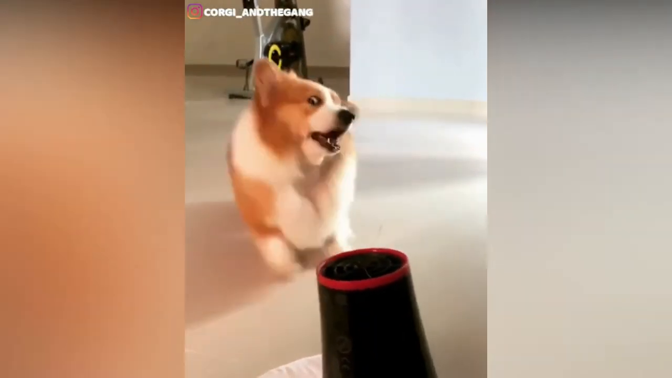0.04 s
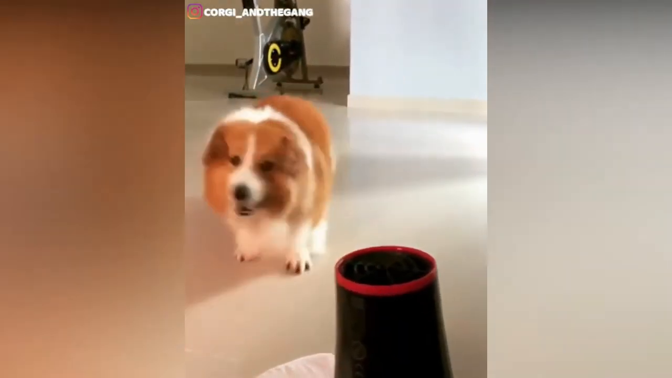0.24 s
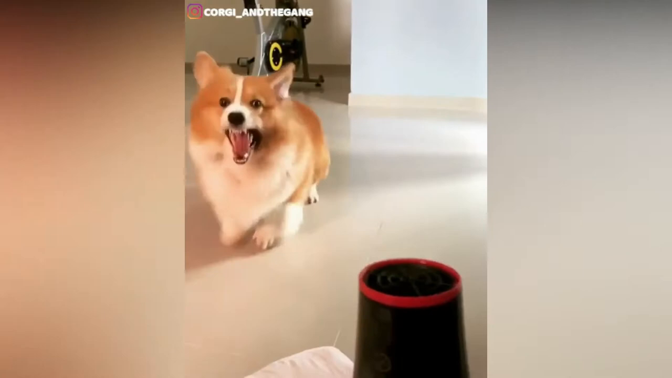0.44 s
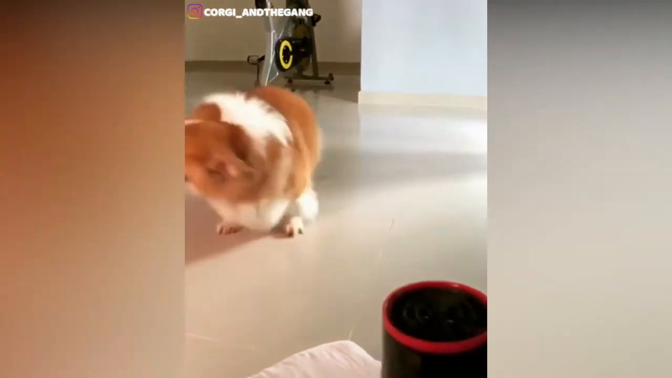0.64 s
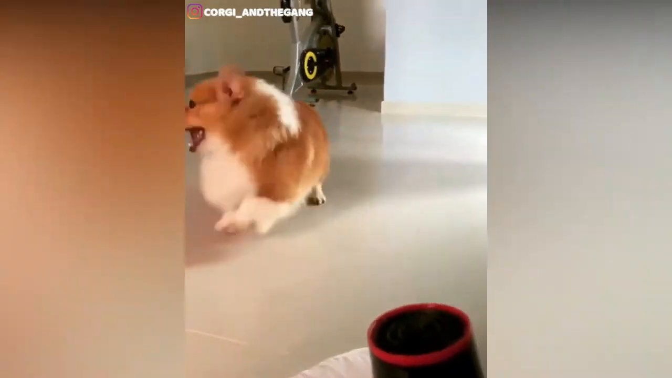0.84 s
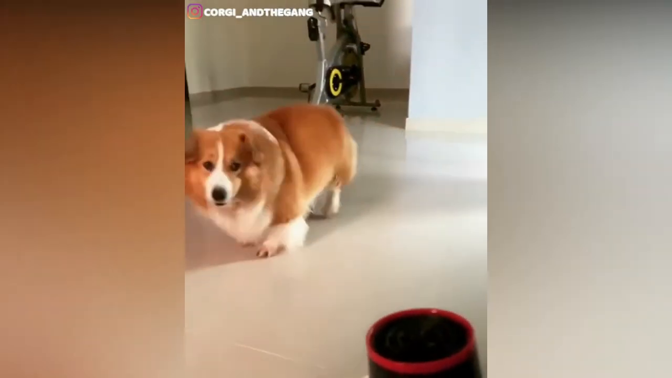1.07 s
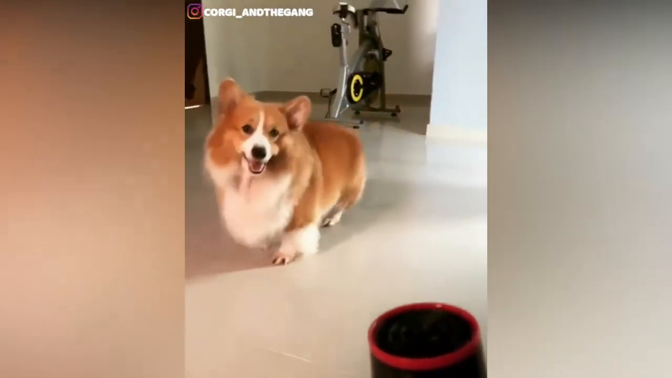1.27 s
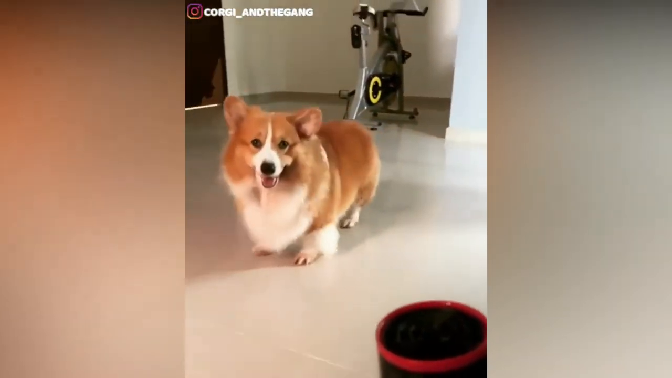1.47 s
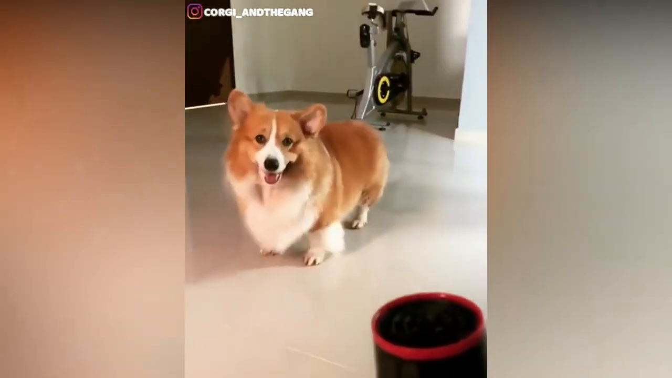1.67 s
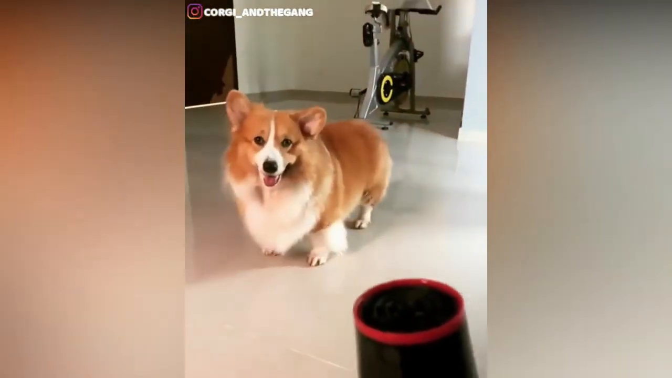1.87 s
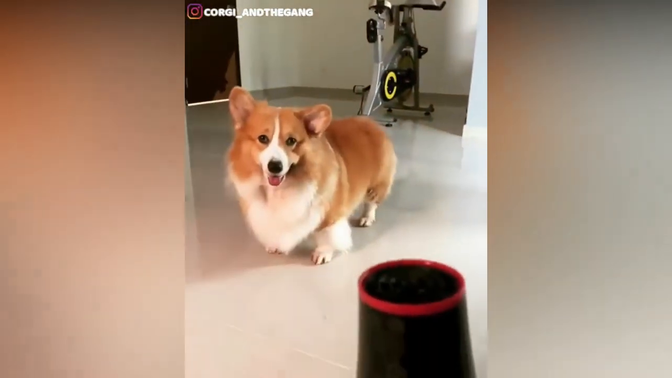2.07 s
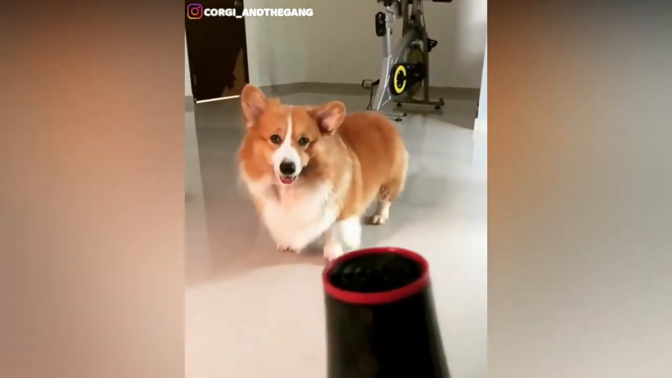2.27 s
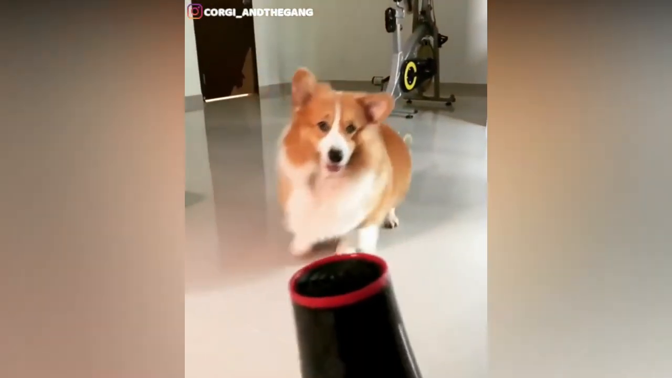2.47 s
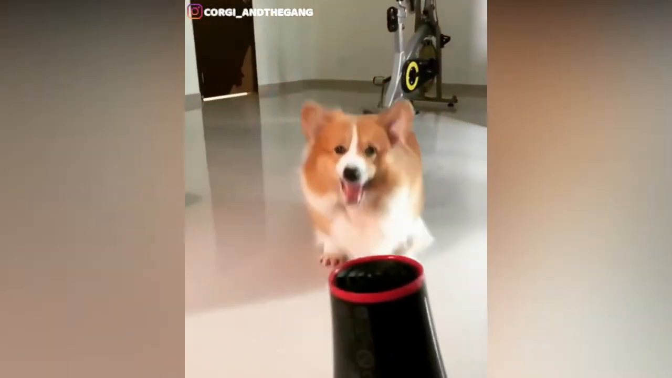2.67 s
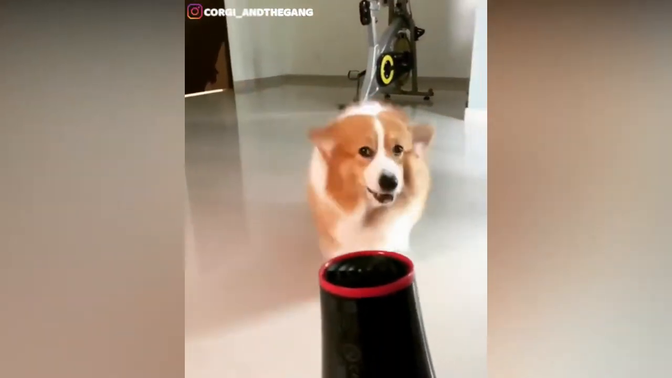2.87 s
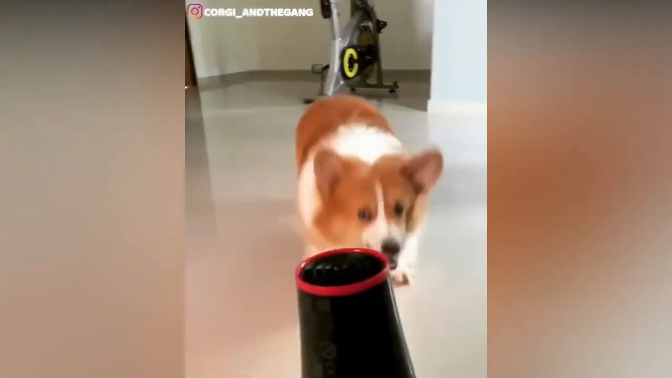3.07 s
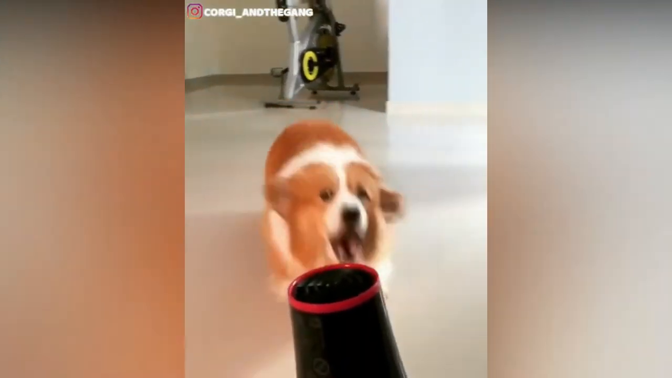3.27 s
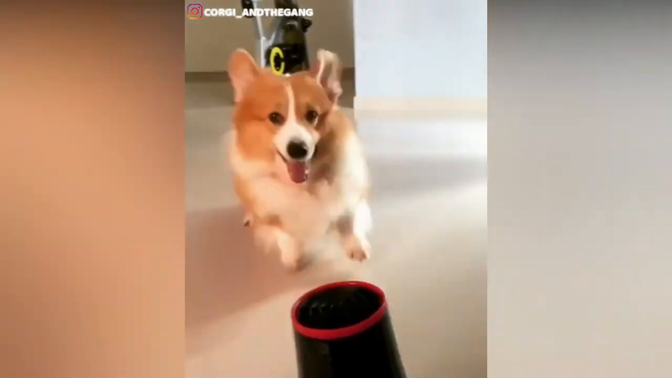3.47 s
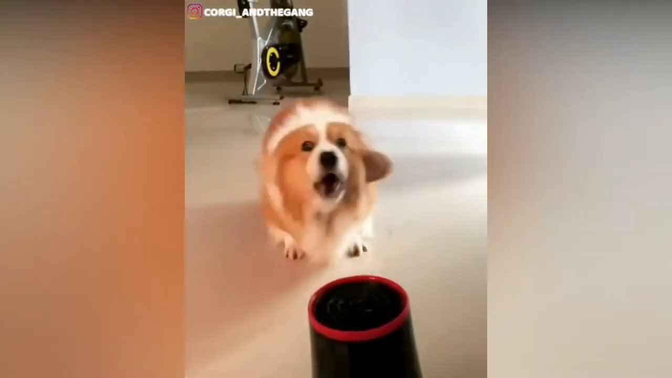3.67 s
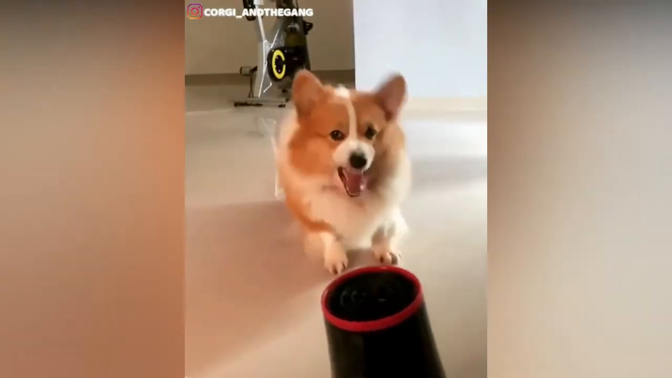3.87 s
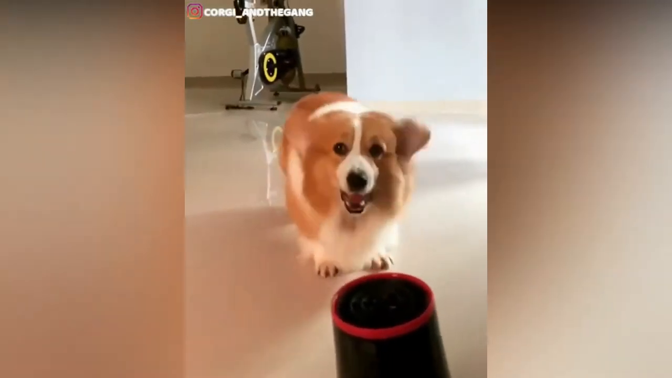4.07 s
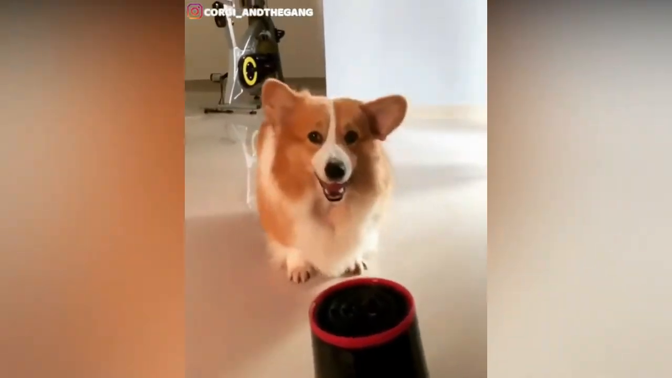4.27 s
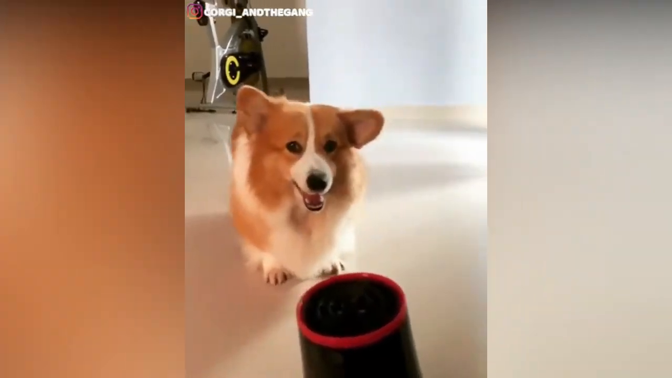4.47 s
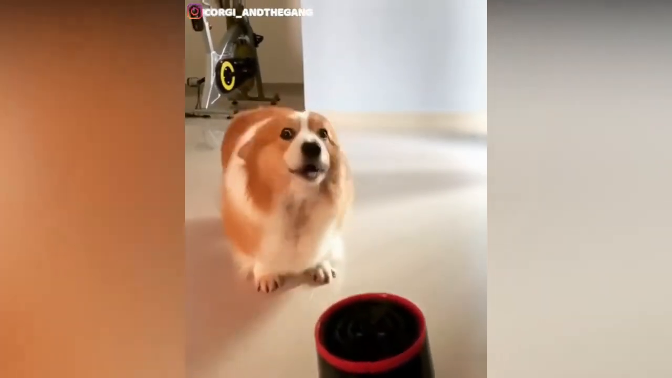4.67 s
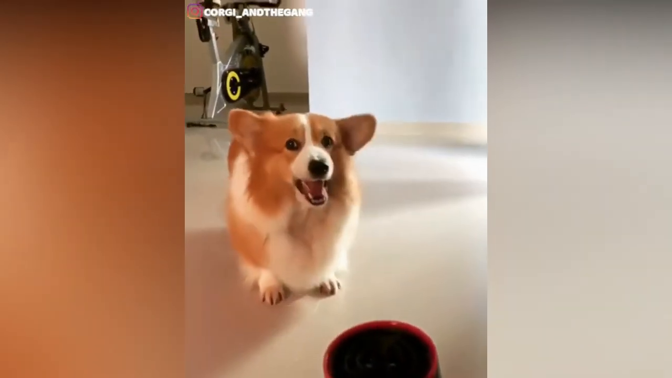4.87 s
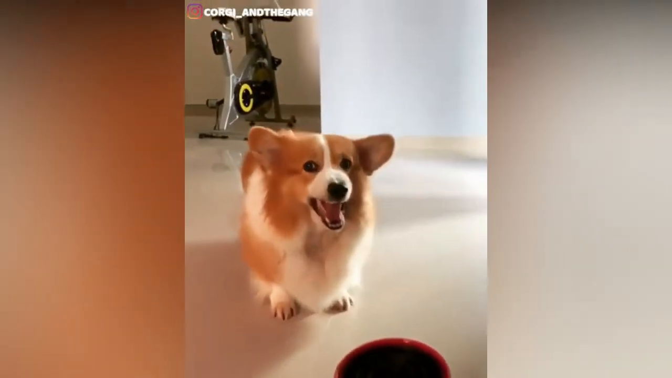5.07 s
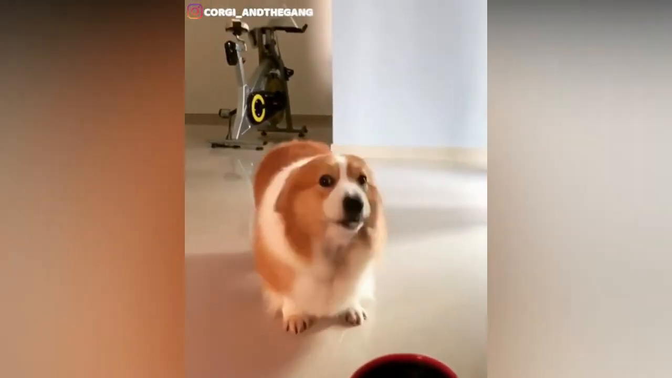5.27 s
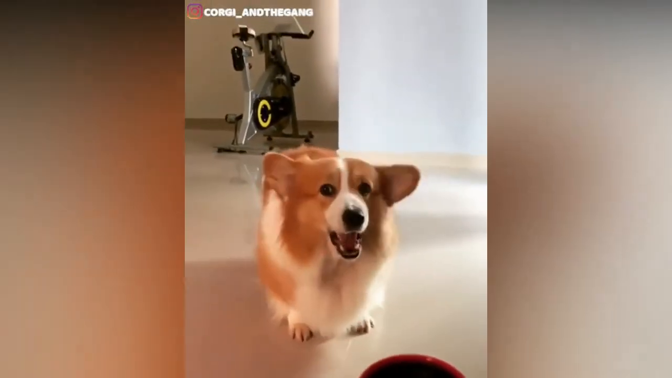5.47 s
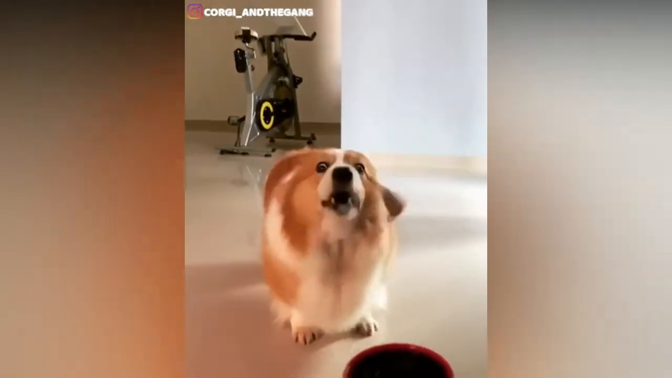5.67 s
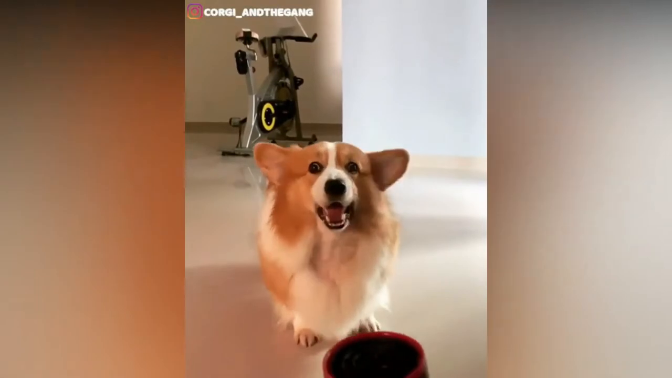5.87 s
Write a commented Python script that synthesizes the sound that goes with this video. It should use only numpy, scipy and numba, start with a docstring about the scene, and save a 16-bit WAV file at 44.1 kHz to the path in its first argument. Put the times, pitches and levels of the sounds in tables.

```python
"""Small dog barking at a hair dryer

A small dog barks ten times in a bare, tiled room, its claws ticking and paws bumping between barks.
Each bark opens low and hoarse, most break upward into a yelp, and all fall away while the room rings on.
A hair dryer clicks on close by, spins up and blows: shaped noise plus two faint tones from the fan.
The voice is a sum of wavering harmonics plus noisy air; a phone's limiter turns down the loudest peaks."""
import sys
import numpy as np
from scipy import signal
from scipy.fft import rfft, irfft, next_fast_len
from scipy.io import wavfile
from scipy.ndimage import uniform_filter1d, minimum_filter1d
from numba import njit

SR = 44100
rng = np.random.default_rng(int(sys.argv[2]) if len(sys.argv) > 2 else 0)


def waveform_to_disk(signal):
    """Save audio, clipped to [-1, 1], as 16-bit WAV at the path in sys.argv[1]."""
    frames = np.transpose(np.atleast_2d(signal))
    scaled = np.clip(frames, -1, 1) * 32767
    samples = np.round(scaled).astype(np.int16)
    wavfile.write(sys.argv[1], SR, samples)


N = 261954
T = np.arange(N) / SR


def undb(db):
    """Turn decibels into a plain multiplier."""
    return 10 ** (np.asarray(db) / 20)


def unit(x):
    """Scale a sound to an average (RMS) strength of 1."""
    return x / np.sqrt(np.mean(x ** 2) + 1e-20)


def steady(x):
    """Hold the short-term power at 1, so that effort alone sets the loudness."""
    return x / np.sqrt(uniform_filter1d(x ** 2, size=500) + 1e-12)


def blend(a, b, share):
    """Go from a to b as share goes from 0 to 1."""
    return a + (b - a) * share


def curves(rows, t):
    """Join the columns of a table by straight lines in time."""
    s, *columns = np.transpose(rows)
    return [np.interp(t, s, c) for c in columns]


def at_hz(points, hz):
    """Read (f/Hz, value) points on a log-frequency axis."""
    f, value = np.transpose(points)
    return np.interp(np.log(hz + 1), np.log(f), value)


def bins(n):
    """The frequencies, in Hz, that make up a sound of n samples."""
    return np.arange(n // 2 + 1) * SR / n


def colour(x, points):
    """Filter by a (f/Hz, level/dB) spectrum."""
    n = x.shape[-1]
    return irfft(rfft(x) * undb(at_hz(points, bins(n))), n)


def walk(n, rate):
    """Smooth chance with spread 1 that changes about rate times a second."""
    knots = np.arange(n) * rate / SR
    return unit(np.interp(knots, np.arange(n), rng.standard_normal(n)))


def pair(n, bass_width=0.063, treble_width=0.22):
    """Diffuse noise at two close microphones: alike in the bass, apart in the treble."""
    mid, side = rng.standard_normal((2, n))
    width = at_hz([(110, bass_width / 4), (450, bass_width), (4000, treble_width)], bins(n))
    side = irfft(rfft(side) * width, n)
    return np.array([mid + side, mid - side])


# tones at which the room rings along with the voice: (f/Hz, width/Hz, level/dB)
ROOM_MODES = [(800, 56, 7), (1318, 360, 5.5)]
# how long echoes take to fade by 60 dB: (f/Hz, t/s)
ROOM_DECAY = [(150, 0.66), (600, 0.72), (1300, 0.76), (2500, 0.86), (6000, 0.98), (11000, 0.58)]


def room(x, rings, build_s=0.00063, gap_s=0.0029):
    """Echoes off tiles and bare walls arrive in clumps, fade at a pace set by pitch, and ring at a few modes."""
    clump_db = 2.5
    t = T[:SR]
    hz = bins(SR)
    modes = 1 + sum((undb(db) - 1) / (1 + (2 * (hz - f) / w) ** 2) for f, w, db in rings)
    clumps = undb(clump_db * walk(SR, 220.93))
    echoes = rfft(pair(SR, bass_width=0.59, treble_width=0.22) * clumps) * modes
    centres = [f for f, _ in ROOM_DECAY]
    response = 0
    # each band peaks at its own centre and dies at its own pace
    for share, (_, t60) in zip(np.eye(len(centres)), ROOM_DECAY):
        band = irfft(echoes * at_hz(list(zip(centres, share)), hz), SR)
        response = response + band * np.exp(-np.log(1000) * t / t60)
    response = response * (1 - np.exp(-np.maximum(t - gap_s, 0) / build_s))
    response = response / np.sqrt(np.sum(response ** 2) / 2)
    return signal.fftconvolve(x[None], response, axes=1)[:, :N]


# tone balance of the quiet room, before its level is set: (f/Hz, level/dB)
MURMUR = [(18, -29), (30, -7.5), (77, -2.5), (98, -6), (149, -7.5), (206, -3.5), (3280, -30), (4630, -35),
          (9250, -45.5), (11000, -47), (14300, -86), (22000, -120)]
MURMUR_DB = -51


def murmur(early_db=9):
    """Low murmur of the room: filtered noise, stronger at first."""
    swell_db = np.interp(T, [.1, 1.6], [early_db, 0]) + walk(N, 5.1)
    return unit(colour(pair(N), MURMUR)) * undb(MURMUR_DB + swell_db)


def knocks(rows, body, rise_s, decay_s, width):
    """Short contacts, each a burst that swells to its peak and dies in a well-damped body."""
    shape = sum(undb(db) * np.exp(-np.maximum((s - T) / rise_s, (T - s) / decay_s)) for s, db in rows)
    return shape * unit(colour(pair(N, treble_width=width), body))


# the two steps of the dryer's switch: (t/s, level/dB)
SWITCH = [(2.3565, -15.5), (2.4002, -11.5)]
# tone balance of its plastic: (f/Hz, level/dB)
SWITCH_BODY = [(200, -13.5), (900, -6), (1600, -5.5), (2400, -4.5), (3400, -1), (4800, -1), (7000, 0),
               (10000, -2.5), (12000, -6)]


def switch(slide_db=-24):
    """The plastic switch snaps in short bursts over a fainter, longer slide."""
    snap = knocks(SWITCH, SWITCH_BODY, rise_s=0.00075, decay_s=0.0023, width=0.75)
    slide = knocks(SWITCH, SWITCH_BODY, rise_s=0.0033, decay_s=0.011, width=0.47)
    return snap + undb(slide_db) * slide


# claws on the tiles: (t/s, level/dB)
CLAWS = [(1.57, -49), (2.017, -51), (2.128, -53), (2.222, -44), (2.296, -51)]
# tone balance of a claw tick: (f/Hz, level/dB)
CLAW_BODY = [(300, -10), (1800, 4), (5000, -11), (8000, -6), (11000, -11.5)]


def claws():
    """Hard claws tick on the tiles in short, bright bursts of noise."""
    return knocks(CLAWS, CLAW_BODY, rise_s=0.0012, decay_s=0.0037, width=0.99)


# dull bumps as the dog hops and lands: (t/s, level/dB)
BUMPS = [(.15, -23), (.22, -42), (.5, -41.5), (.59, -34.5), (.635, -46), (.95, -38.5), (1.05, -37.5),
         (3.17, -36.5), (3.24, -45), (3.285, -65), (3.63, -43)]
# tone balance of a bump: (f/Hz, level/dB)
BUMP_BODY = [(30, -17), (70, -9), (130, -4.5), (280, -8), (500, -21), (2000, -59), (8000, -99)]


def bumps():
    """Soft paws land in slow, low bursts of noise."""
    return knocks(BUMPS, BUMP_BODY, rise_s=0.022, decay_s=0.15, width=0.24)


def small_sounds(click_room_db=-9, bump_room_db=-8):
    """Switch, claws and paws, straight to the microphones and by way of the room."""
    clicks = switch() + claws()
    thumps = bumps()
    sent = undb(click_room_db) * clicks + undb(bump_room_db) * thumps
    return clicks + thumps + room(sent.mean(axis=0), ROOM_MODES, build_s=0.0067)


LANDING_S, LANDING_HZ, LANDING_DB = 3.26, 71.5, -25


def landing(rise_s=0.023, decay_s=0.03):
    """One heavy landing close to the phone makes a low thud: a sine that swells and dies."""
    age = T - LANDING_S
    envelope = np.exp(-np.maximum(-age / rise_s, age / decay_s))
    return undb(LANDING_DB) * np.sin(2 * np.pi * LANDING_HZ * age) * envelope


# tone balance of the air rushing through the barrel: (f/Hz, level/dB)
RUSH = [(50, 1.5), (120, 8), (250, 4), (380, 10), (480, 11), (700, 16), (1100, 6.5), (1550, 14), (1850, 6),
        (2600, 8), (3100, -13.5), (4500, -82), (7000, -70)]
# tone balance of the hiss at the nozzle: (f/Hz, level/dB)
HISS = [(1000, -41), (2800, 6.5), (4000, 7.5), (4900, 2), (6000, 8.5), (7300, 4.5), (9000, 3.5),
        (10300, 0.5), (12000, 3)]
RUSH_DB, HISS_DB = -32.5, -37.5
# the hand lowers the dryer away from the microphone: (t/s, level/dB)
DRYER_AIM = [(3.15, 2), (3.7, 1), (4.4, -4.5), (5.2, -5.5)]
HISS_AIM_SHARE = 0.44  # the hiss follows only this share of the aim
# the motor nears full speed exponentially, and its noise grows as a power of the speed
DRYER_ON_S, SPIN_UP_S, BLADE_HZ, SPEED_POWER = 2.46, .15, 1035, 1.68
# a fainter whine rises with the blade tone, above it
WHINE_RATIO, WHINE_DB = 1.7, -8.5
BUFFET_DB = 3.5  # turbulent air makes both tones flutter


def dryer():
    """The fan spins up: air rushes through the barrel, hisses at the nozzle, and the blades add a faint tone."""
    blade_db, flutter_db, waver = -10.5, .5, .002
    age = np.maximum(T - DRYER_ON_S, 0)
    speed = 1 - np.exp(-age / SPIN_UP_S)
    blow = speed ** SPEED_POWER
    aim_db, = curves(DRYER_AIM, T)
    rush = unit(colour(pair(N, bass_width=0.038, treble_width=0.04), RUSH))
    hiss = unit(colour(pair(N, bass_width=.3, treble_width=0.15), HISS))
    turn = 2 * np.pi * np.cumsum(BLADE_HZ * speed * (1 + waver * walk(N, 3.0))) / SR
    buffet = undb(BUFFET_DB * walk(N, 60))
    blades = unit(buffet * (np.sin(turn) + undb(WHINE_DB) * np.sin(WHINE_RATIO * turn)))
    barrel = blow * undb(RUSH_DB + aim_db)
    flow = (rush + undb(blade_db) * blades) * barrel * undb(flutter_db * walk(N, 45))
    nozzle = blow * undb(HISS_DB + HISS_AIM_SHARE * aim_db)
    return flow + hiss * nozzle * undb(.5 * walk(N, 38))


# every bark opens low, hoarse and quiet
OPEN_HZ, OPEN_ROUGH, ATTACK_DB = 238.2, 0.92, 26
# late in the held note the voice slides, frays and weakens, then it breaks into the yelp
SLIDE_S, FRAY, FRAY_S, SAG_DB, BREAK_S = .025, 0.39, 0.019, 4.5, .0039
# the yelp arches: it starts this share below its top and scoops up
SCOOP_SHARE, SCOOP_S = 0.065, 0.0057
# it is clearer, loudest a moment into its fall, and dies away low and a little rough
YELP_ROUGH_SHARE, FALL_S, END_HZ, END_ROUGH = 0.12, .035, 265.5, 0.44
SWELL_DB, SWELL_S, RELEASE_S, RELEASE_DB = 5, 0.022, 0.062, 28.5


def gesture(age, attack_s, settle_s, break_s, hold_s, held_hz, late_hz, yelp_hz, held_db, yelp_db, rough):
    """Pitch, effort and roughness through one bark: hoarse start, held note, break, falling yelp."""
    fall_at = break_s + hold_s
    loudest = fall_at + SWELL_S
    settled = np.clip(age / settle_s, 0, 1) ** 2
    to_break = np.maximum(break_s - age, 0)
    fraying = np.exp(-to_break / FRAY_S)
    broken = np.clip((age - break_s) / BREAK_S + .5, 0, 1)
    fallen = 1 - np.exp(-(np.maximum(age - fall_at, 0) / FALL_S) ** 2)
    slid = 1 - np.exp(-(np.maximum(age - settle_s, 0) / SLIDE_S) ** 2)

    note_hz = blend(OPEN_HZ, blend(held_hz, late_hz, slid), settled)
    scoop = 1 - SCOOP_SHARE * np.exp(-np.maximum(age - break_s, 0) / SCOOP_S)
    cry_hz = blend(yelp_hz * scoop, END_HZ, fallen)

    note_rough = blend(OPEN_ROUGH, rough, settled) + FRAY * fraying
    cry_rough = blend(YELP_ROUGH_SHARE * rough, END_ROUGH, fallen ** 1.5)

    quiet_start = np.clip(1 - age / attack_s, 0, 1) ** 1.07
    note_db = held_db - ATTACK_DB * quiet_start - SAG_DB * fraying
    cry_levels = [yelp_db - SWELL_DB, yelp_db, yelp_db - RELEASE_DB]
    cry_db = np.interp(age, [break_s, loudest, loudest + RELEASE_S], cry_levels)
    return (blend(note_hz, cry_hz, broken), blend(note_db, cry_db, broken),
            blend(note_rough, cry_rough, broken))


SECOND_LEAD_S, SECOND_WIDTH_S, SECOND_RISE_HZ_PER_S = .012, .016, 3500


def second_voice(t, peak_s, hz, db, waver=0.018):
    """As the held note frays, the folds also swing in a second mode that rises into the yelp."""
    lead = peak_s - t
    rising_hz = hz - SECOND_RISE_HZ_PER_S * (lead + SECOND_LEAD_S)
    pitch = rising_hz * (1 + waver * walk(SR, 249)[:len(t)])
    tone = np.sqrt(2) * np.sin(2 * np.pi * np.cumsum(pitch) / SR)
    return undb(db) * tone * np.exp(-(lead / SECOND_WIDTH_S) ** 2)


GROWL_LOW_HZ, GROWL_TOP_HZ, GROWL_LEAD_S, GROWL_GLIDE_S = 105, 338, .012, .045


def growl(age, db, growl_s):
    """Before the jaws open, only a low rising growl gets out: one gliding tone that swells and fades."""
    rise = np.maximum(age + GROWL_LEAD_S, 0) / growl_s
    hz = blend(GROWL_TOP_HZ, GROWL_LOW_HZ, np.exp(-rise * growl_s / GROWL_GLIDE_S))
    return undb(db) * np.cos(2 * np.pi * np.cumsum(hz) / SR) * (rise * np.exp(1 - rise)) ** 2


def vocal_folds(hz, rough, tilt_db):
    """Folds that beat unevenly when rough: a sum of harmonics, with a puff of turbulence on each beat."""
    wobble, jitter, chaos, half_lines = .03, .045, 1.25, 1
    octave_db, odd_db = 12, -13
    n = len(hz)
    clear = (1 - rough) ** 1.5
    hz = hz * (1 + wobble * rough * walk(SR, 71.06)[:n])
    phase = 2 * np.pi * np.cumsum(hz * (1 + jitter * rough * walk(SR, 348.4)[:n])) / SR
    # a clear voice favours the even harmonics, the second above all; hoarse folds add lines in between
    k = np.arange(1, 12, .5)[:, None]
    even = k % 2 == 0
    clear_db = clear * (octave_db * (k == 2) + odd_db * ~even * clear)
    strength = undb(tilt_db * np.log2(k) + clear_db)
    strength = strength * np.where(k % 1, half_lines * np.sqrt(rough), 1)
    # chaotic beats shake the even harmonics only when rough, the other lines always
    chance = np.array([[walk(SR, 120)[:n] for _ in k] for _ in range(2)])
    shake, flicker = chance * chaos * np.where(even, .7 * rough, 1)
    # k ** 2: the throat delays each harmonic differently
    folds = np.sum(strength * (1 + flicker / 2) * np.cos(k * phase + k ** 2 + shake), axis=0)
    puffs = rng.standard_normal(SR)[:n] * (1 + .7 * np.cos(phase))
    return folds, puffs


# throat and open mouth: (f/Hz, level/dB)
THROAT = [(35, -24.5), (90, -3.5), (200, 2.5), (400, -24), (540, 2.5), (800, 4.5), (1150, 10.5),
          (1550, 0.5), (1900, -4), (2400, -8.5), (3100, -40), (4500, -47.5), (10000, -60.5)]
# where the chest booms: (f/Hz, share of the bark's chest level 0-1)
CHEST = [(130, 0.8), (290, 0.3), (440, .95), (570, 1), (850, 0.09)]
# the mouth's upper resonance: (ratio to its centre, share of the bark's mouth level)
MOUTH = [(.72, 0), (.85, .2), (1, 1), (1.1, .65), (1.25, -.1), (1.6, .3)]
# air rushing past tongue and teeth: (f/Hz, level/dB)
TEETH = [(800, -16), (1800, 11.5), (2600, 9), (3200, 3.5), (4100, 8), (5000, 4), (6300, 6.5), (8200, 4.5),
         (10500, -1.5)]
# bared teeth add a narrow bite to that air: (f/Hz, share of the bark's bite level 0-1)
BITE = [(2000, 0), (2450, .8), (2750, 0.9), (3150, 0)]
AIR_LEFT_SHARE = 0.47  # air flow late in a bark, on the scale of blend below


def bark(start, shape, chest_db, teeth_db, mouth_db, growl_db, mouth_hz, jaw_s, bite_db, air_s,
         second_hz, second_db, tilt_db=-3, growl_s=0.046):
    """Beating vocal folds and their puffs of air sound through throat, chest, mouth and teeth."""
    rasp, shudder_db = .3, 3.5
    attack_s, _, break_s, hold_s, *_ = shape
    end = start + break_s + hold_s + SWELL_S + RELEASE_S
    span = np.flatnonzero((T > start - .02) & (T < end + .02))
    t, n = T[span], len(span)
    age = np.maximum(t - start, 0)
    hz, effort_db, rough = gesture(t - start, *shape)
    rough = np.clip(rough, .05, 1)
    folds, puffs = vocal_folds(hz, rough, tilt_db)

    chest = [(f, chest_db * share) for f, share in CHEST]
    mouth = [(mouth_hz * ratio, mouth_db * share) for ratio, share in MOUTH]
    bite = [(f, bite_db * share) for f, share in BITE]
    # the upper resonance comes in as the jaw drops
    jaw = np.minimum(age / jaw_s, 1) ** 6
    shut = [colour(colour(x, THROAT), chest) for x in (folds, puffs)]
    tone, hoarse = [steady(blend(x, colour(x, mouth), jaw)) for x in shut]

    # air hisses most in the hoarse opening of the bark, then thins out
    rushing = (0.33 + rough ** 2) * blend(AIR_LEFT_SHARE, 0.94, np.exp(-(age / air_s) ** 2))
    gusts = undb(teeth_db + 2 * walk(SR, 99.5)[:n])
    air = colour(unit(colour(puffs, TEETH)), bite) * gusts * rushing

    voice = (steady(tone + rasp * rough * hoarse) + air) * undb(effort_db)
    voice = voice + second_voice(t, start + break_s - SECOND_LEAD_S, second_hz, second_db)
    # a rough voice shudders as the air comes in gusts
    voice = voice * undb(shudder_db * np.minimum(3 * rough, 1) * np.tanh(walk(SR, 220)[:n]))
    # fade in and out at the ends
    voice = voice * np.clip(np.minimum(3 * (t - start) / attack_s + .2, (end - t) / .006 + 1), 0, 1)
    out = np.zeros(N)
    out[span] = voice + growl(t - start, growl_db, growl_s)
    return out


# one row per bark; levels are relative, before the dog's overall level:
# (start t/s, attack t/s, settling on a pitch t/s, start to break t/s, hold of the yelp t/s,
#  held note f/Hz, note it slides to f/Hz, yelp f/Hz, held level/dB, yelp level/dB, roughness 0-1,
#  sent to the walls level/dB, chest boom level/dB, air through the teeth level/dB,
#  upper mouth resonance level/dB, opening growl level/dB, upper mouth resonance f/Hz,
#  jaw drop t/s, bite of the bared teeth level/dB, rush of air t/s,
#  second voice at the break f/Hz, second voice level/dB, room ring from where the dog stands f/Hz)
BARKS = [ (.114, 0.11, 0.079, .17, .012, 578.8, 377.5, 565.7, -4, 2.5, 0.17, 1.5, 3, -5.5, 18.5, -25, 1880, 0.16, 0, 0.11, 1000, 0, 1196),
         (.670, 0.023, 0.029, 0.077, .009, 451.8, 405.2, 726.4, -1, 2, 0.4, -2.5, 0.5, -12, 5, -23.5, 1650, .012, -0.5, 0.075, 1184, -7, 1081),
         (1.123, 0.034, 0.042, .072, 0.0009, 341.2, 290, 302, -11, -21.5, 0.76, -4, 12.5, -20, 17.5, -35, 1658, 0.026, 12, 0.05, 1133, -31.5, 727),
         (2.853, .02, 0.027, 0.099, 0.002016, 593.8, 410, 778.6, -1.5, -0.5, 0.3, -5.5, 2, -11, 4.5, -34, 1490, 0.0077, -3.5, 0.049, 1201, -14.5, 1130),
         (3.326, 0.033, .02, 0.084, 0.026, 388.9, 465.6, 847, -3.5, -2, 0.17, -9, 8.5, -10.5, 13, -34, 2040, 0.037, 5, 0.24, 1049, -6.5, 1148),
         (3.752, 0.013, .014, 0.079, .005, 488, 428.1, 800, -6.5, -6.5, 0.38, -6.5, -12, -18.5, 3, -40.5, 1970, 0.026, -2.5, 0.6, 1226, -5, 1190),
         (4.041, 0.038, .04, .072, .017, 412.1, 395.3, 607, -9.5, -10.5, 0.24, -4.5, -5.5, -13, 11, -35, 2080, .04, 1, 0.063, 1193, -17, 1167),
         (4.714, 0.066, .044, 0.088, .004, 427.2, 414.2, 757.3, -3, -2.5, 0.32, -11, -4, -17.5, 2, -56, 1840, 0.054, -4, 0.34, 1185, -11, 1024),
         (5.32, 0.035, .028, 0.086, 0.004, 456.2, 400, 662, -6, -8.5, .21, -6.5, -3, -13.5, 7.5, -55, 1810, 0.015, 7.5, .12, 1159, -16, 1080),
         (5.742, 0.036, 0.03, 0.077, 0.0047, 442, 408.8, 671, -4.5, -8.5, .23, -10, 1.5, -15, 8, -49, 1590, 0.0083, 12.5, 0.17, 1229, -19.5, 1213),
         ]
RING_WIDTH_HZ, RING_DB = 120, 8
# first reflections, off the floor and the nearest wall: (delay t/s, gain)
SLAPS = [(.0026, .4), (.0087, .3)]
# treble is beamed forward, so less of it reaches the walls: (f/Hz, level/dB)
SPILL = [(200, -2), (600, 0.5), (1200, -6), (1900, -0.5), (2700, -6), (8000, -3.5)]


def dog(loud_db=2):
    """All barks: straight from the mouth, off near surfaces and by way of the room, each with its own ring."""
    direct, echo = 0, 0
    for start, *row, ring_hz in BARKS:
        shape, (walls_db, *head) = row[:10], row[10:]
        voice = undb(loud_db) * bark(start, shape, *head)
        direct = direct + voice
        rings = ROOM_MODES + [(ring_hz, RING_WIDTH_HZ, RING_DB)]
        echo = echo + room(undb(walls_db) * voice, rings)
    slaps = sum(gain * np.interp(T - delay, T, direct) for delay, gain in SLAPS)
    return direct + slaps + colour(echo, SPILL)


def scene():
    """Add up all the layers, from the background to the dog."""
    return murmur() + small_sounds() + landing() + dryer() + dog()


# the left microphone is shaded in the low middle: (f/Hz, level/dB)
LEFT_SHADE = [(100, -0.5), (300, -1.7), (650, -2.5), (1100, -0.34), (3000, -0.18)]
# the phone's body delays the right microphone against the left: (f/Hz, phase/radians)
PORT_PHASE = [(0, 0), (700, .55), (1100, .3), (2800, .6), (3400, 1.9), (4300, 2), (5100, 3.1), (5700, 4.4),
              (6400, 5.7), (9500, 6.5), (10000, 7.2), (10400, 9), (11500, 9.5)]


def ports(x):
    """The left microphone is a little shaded; the right has a phase shift that depends on pitch."""
    size = next_fast_len(N + SR)
    shade = undb(at_hz(LEFT_SHADE, bins(size)))
    shift = np.exp(-1j * np.interp(bins(size), *np.transpose(PORT_PHASE)))
    return irfft(rfft(x, size) * np.array([shade, shift]), size)[:, :N]


@njit
def hold_peaks(x, release):
    """Jump to each peak and let go slowly."""
    out, e = np.empty(len(x)), 0.
    for i in range(len(x)):
        e = max(x[i], e * release)
        out[i] = e
    return out


TOP_HZ = 11000  # nearly nothing is left above this


def record(dry, ceiling=0.99, release_s=0.073):
    """The phone's look-ahead limiter turns peaks down and recovers slowly; what gets past is rounded off."""
    x = ports(dry)
    peaks = hold_peaks(np.abs(x).max(axis=0), np.exp(-1 / (release_s * SR)))
    gain = np.minimum(1, ceiling / (peaks + 1e-9))
    # spreading each dip both ways lets the gain drop before its peak
    x = x * uniform_filter1d(minimum_filter1d(gain, size=130), size=130)
    x = x / (1 + x ** 8) ** (1 / 8)
    return signal.sosfilt(signal.ellip(8, .2, 70, TOP_HZ, fs=SR, output="sos"), x)


dry = scene()
out = record(dry)
waveform_to_disk(out)
```